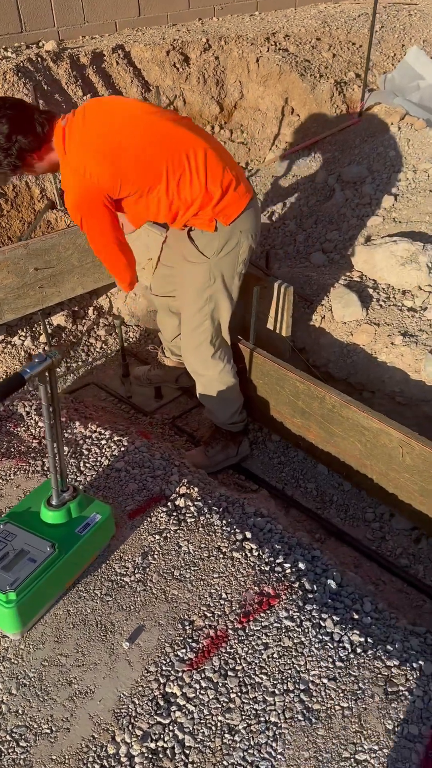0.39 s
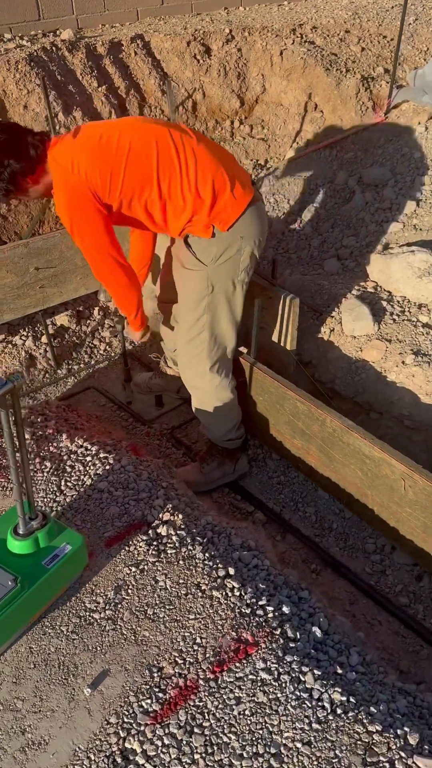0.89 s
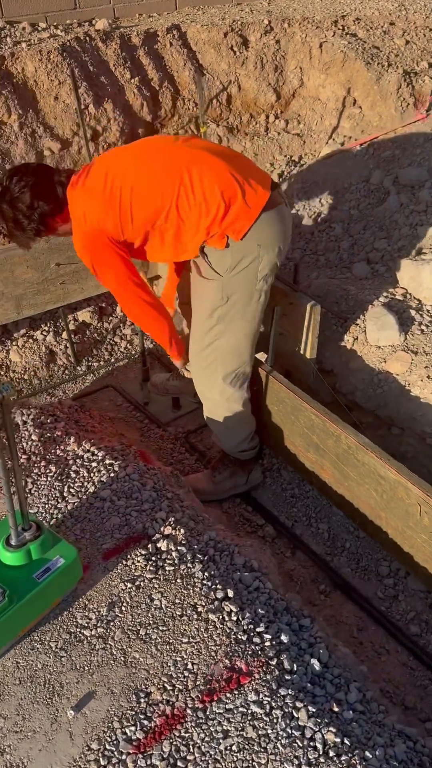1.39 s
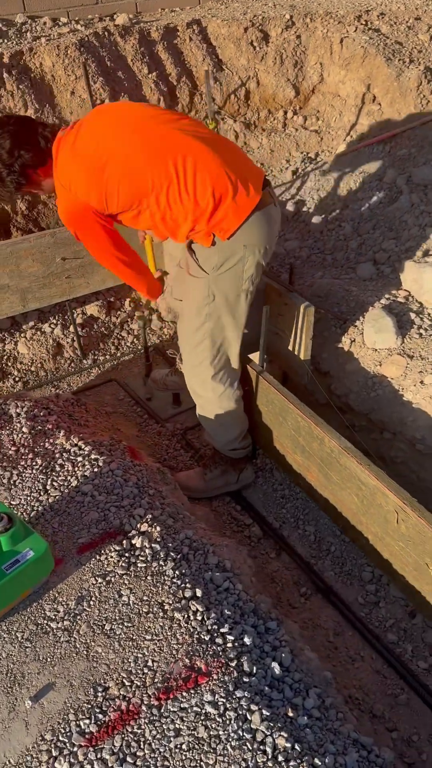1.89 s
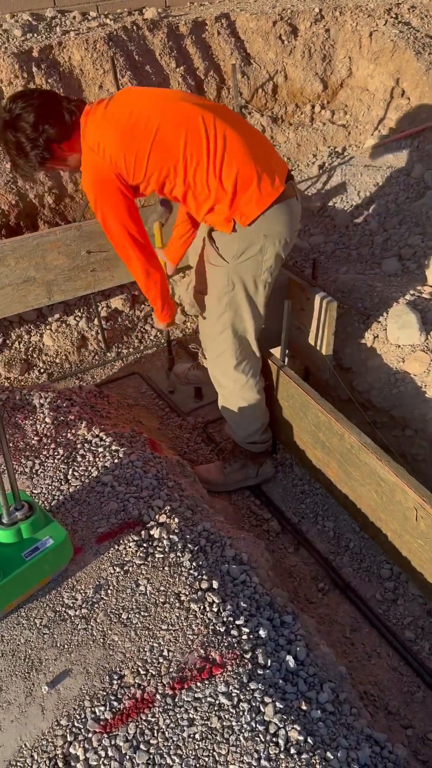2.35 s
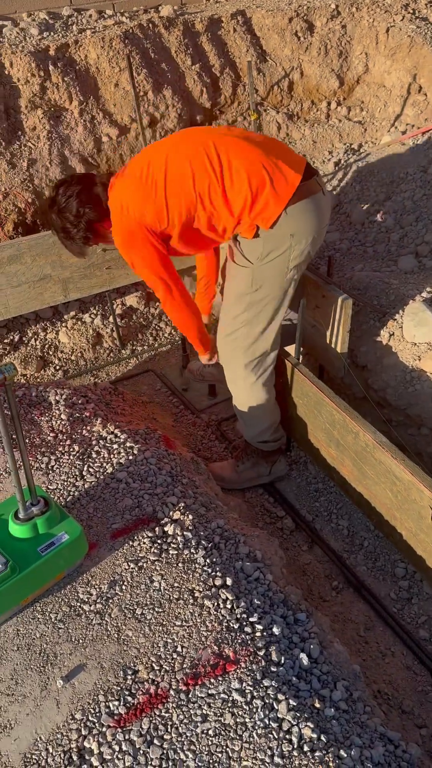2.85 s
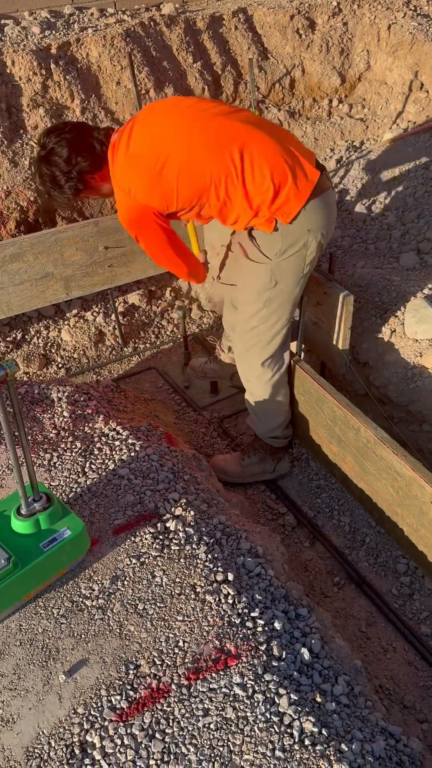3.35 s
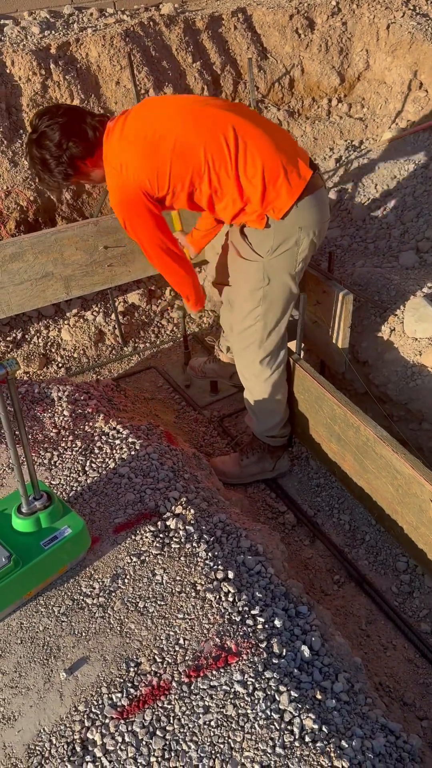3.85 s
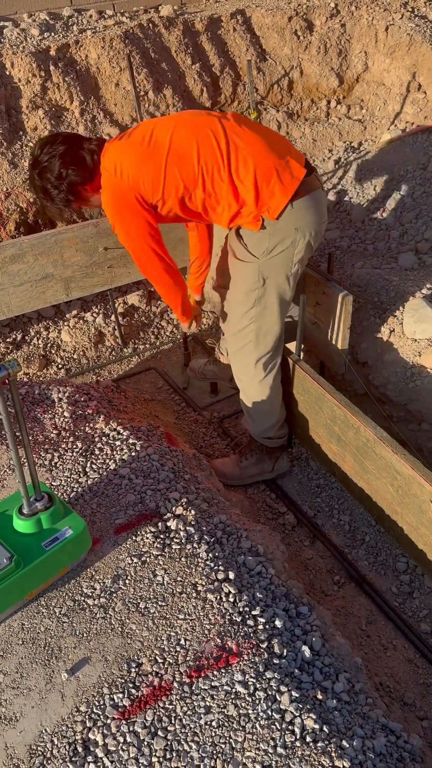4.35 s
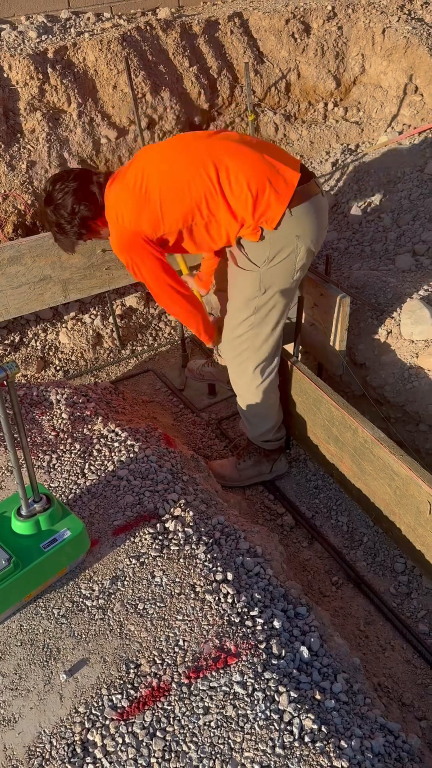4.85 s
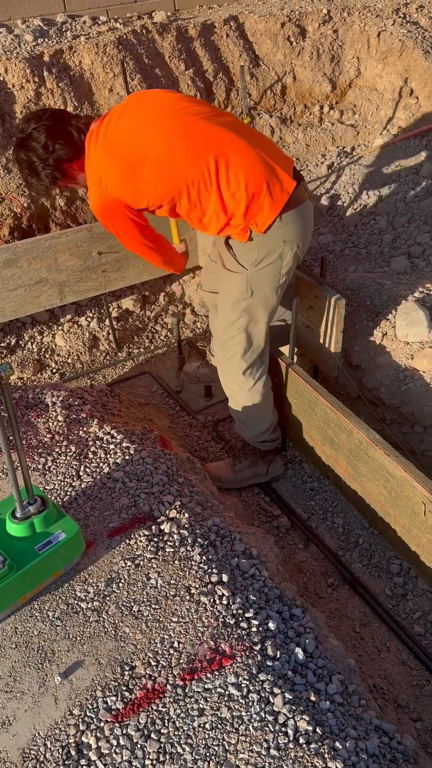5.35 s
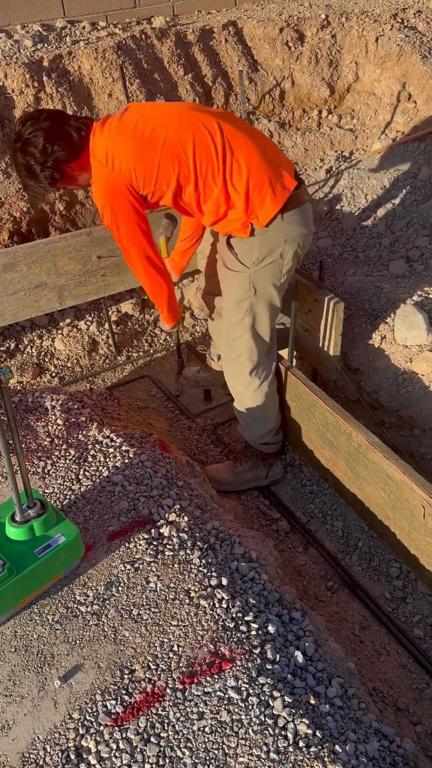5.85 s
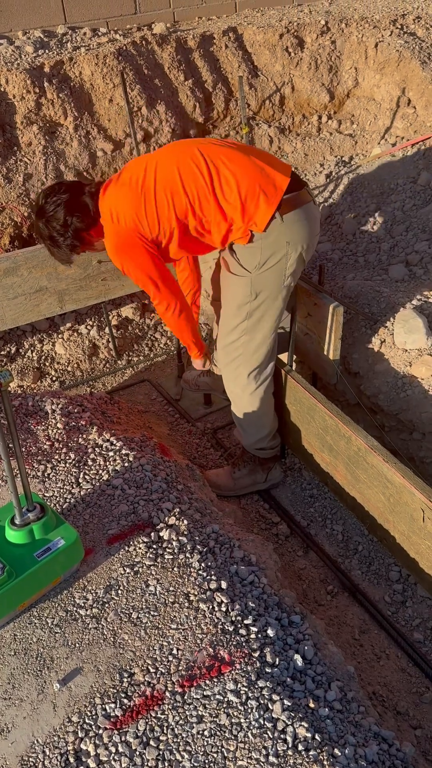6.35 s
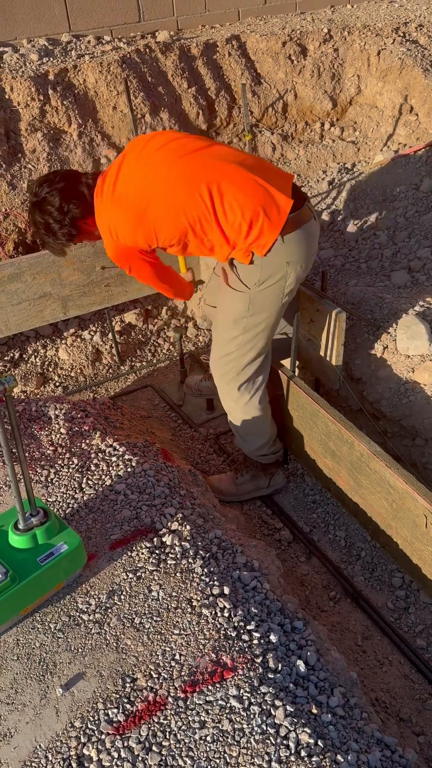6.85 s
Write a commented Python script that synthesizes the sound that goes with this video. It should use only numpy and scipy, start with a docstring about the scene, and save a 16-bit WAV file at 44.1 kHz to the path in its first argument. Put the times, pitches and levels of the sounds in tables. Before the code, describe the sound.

Open-air building site, heard close in stereo, almost without reverberation. A quiet low rumble lasts throughout; a distant engine hums low at the start and fades out by about 3 seconds. Small scuffs of grit come near 0.6 seconds. At about 0.75 a steel hammer cracks onto a steel pin, then again near 1.5, 2.1, 2.8, 3.6, 4.3, 4.9, 5.6, 6.4 and 7.1: ten loud blows of similar strength, slightly uneven in timing. Each begins as a hard bright snap with a short dull thump from the soil, then a loose plate knocks and chatters for about a tenth of a second amid shrill, wavering pin and hammer rings. As the hammer lifts, the pitches slide slightly upward and die, leaving a faint thin ring. Soft gritty rustles fill some gaps, strongest near 1.7 to 2.1 seconds. The last blow is still ringing at the end.

```python
"""Low outdoor rumble runs throughout; a far engine fades over the first seconds, amid soft scuffs of grit.
A sliding steel hammer drives a pin through a loose guide plate into dry soil: ten blows in steady rhythm.
Each is a noise crack, a ground thump of decaying modes, and a pin and hammer ring of wavering sines,
while the plate chatters as crackle through short resonances. Two close microphone ports hear it.
"""
import sys
import numpy as np
from scipy import signal
from scipy.fft import rfft, irfft, next_fast_len
from scipy.io import wavfile
from scipy.ndimage import uniform_filter1d

SR = 44100
rng = np.random.default_rng(int(sys.argv[2]) if len(sys.argv) > 2 else 0)


def field_ratio(decibels):
    """Amplitude ratio for a level in dB (20 dB per decade); scalars and array-likes work."""
    return 10 ** (np.asarray(decibels, dtype=float) / 20)


def pcm_store(signal):
    """Save signal as 16-bit PCM."""
    levels = np.round(np.clip(np.atleast_2d(signal), -1, 1) * 32767)
    wavfile.write(sys.argv[1], SR, levels.astype(np.int16).T)


N = 318843

# outdoor air spectrum: (frequency [Hz], relative density [dB])
AIR = [(20, -10.5), (90, -4), (285, -13.5), (441, -23), (1500, -37.5), (1890, -41.5), (4180, -44.5),
       (9000, -60.5), (12500, -95.5)]
AIR_DB = -66
# level of its lowest band: (time [s], level [dB])
RUMBLE = [(0.0, -61), (2.09, -62), (7.22, -61.5)]
# far engine: (time [s], mean frequency [Hz], mean level [dB])
ENGINE = [(0, 56.3, -52), (.18, 75.4, -57), (0.651, 75.1, -60.5), (1.499, 73.4, -65), (2.1, 76.04, -71),
          (3, 75.6, -83.5)]

# rustles as the worker shifts and raises the hammer:
# (centre [s], nominal level [dB], half length to -9 dB [s])
RUSTLES = [(0.043, -80, 0.04), (0.702, -77.5, 0.14), (0.949, -74.5, 0.082), (1.464, -68, 0.078),
           (1.674, -62, 0.067), (1.876, -72, 0.062), (2.091, -70.5, 0.087), (2.341, -71, 0.069),
           (2.825, -68, 0.069), (3.062, -70, 0.065), (3.503, -81.5, 0.18), (4.762, -74, 0.43),
           (5.149, -74.5, 0.076), (5.843, -74.5, 0.078), (6.545, -69, 0.048)]
# rustle spectrum: (frequency [Hz], relative density [dB])
RUSTLING = [(590, -30), (1000, -6.5), (2860, -5.5), (3330, -4), (4900, -12), (7210, -10.5), (10000, -21),
            (14000, -70)]
# short scuffs of grit: (time [s], level before trim [dB], bright part before trim [dB])
SCUFFS = [(0.087, -62, -8), (0.608, -50, -40), (0.613, -50.5, -37), (0.649, -56.5, -29),
          (0.672, -56, -14.5), (1.401, -56.5, -21), (1.863, -55, -6), (1.89, -51.5, 0.5), (1.911, -54, -28),
          (2.044, -54, -24.5), (2.077, -51.5, -20.5), (2.783, -51, -26), (5.824, -59, -7)]
# scuff spectrum: (frequency [Hz], relative density [dB])
GRIT = [(200, -30), (500, 2), (2500, -1), (4200, -26.5), (7500, -17), (10000, -32.5), (12000, -70)]
# centres of the separately crackling bands [Hz]; small touches differ in colour
CRACKLE_BANDS_HZ = (400, 1300, 2700, 4100, 6500)

# hammer on pin: (time [s], crack level [dB], ground thump level [dB],
# dull part of the crack [dB], bright part [dB], clank level [dB])
BLOWS = [(0.7557, -14.5, -20.5, 1.5, 9.5, -26.5), (1.468, -15, -28, -12.5, 3, -23),
         (2.1354, -14, -25.5, -8, 4.5, -36), (2.8441, -15.5, -26.5, -8.5, 5, -31.5),
         (3.5914, -14.5, -20, -5.5, 2, -33.5), (4.2605, -14, -24.5, -9, 3.5, -27.5),
         (4.9484, -14, -24.5, -8.5, 4, -26.5), (5.6413, -14, -22, -4, 6, -26.5),
         (6.356, -13.5, -29.5, -9, 3.5, -26.5), (7.0559, -13.5, -27, -6.5, 3, -32)]
# crack spectrum: (frequency [Hz], relative density [dB])
CRACK = [(180, -44.5), (300, -19.5), (742, -8), (1060, -5.5), (1800, -7), (2480, -16.5), (2840, -3),
         (3650, -5.5), (5370, -13), (5830, -15.5), (9490, -13), (11200, -33), (15700, -31), (16500, -47.5)]
# modes that simply die away: (frequency [Hz], level against the crack [dB], t60 [s])
FREE_MODES = [(1089.7, -10.5, 0.03), (3510, -9.5, 0.018)]
# clank of the same kind: (frequency [Hz], level against the clank level [dB], t60 [s])
CLANK_MODES = [(2707, 0.5, 0.096)]
# soil and boards: (frequency [Hz], level against the thump [dB], t60 [s])
THUMP_MODES = [(84.6, -10, 0.24), (175.5, 4.5, 0.054), (134, -10.5, 0.17), (259, -6, 0.017)]
# loose soil shudders on after the thump; its level is against the thump
LOOSE_SOIL_HZ, LOOSE_SOIL_WIDTH_HZ, LOOSE_SOIL_DB, LOOSE_SOIL_T60_S = 213, 110, -17.5, .3
# freed hammer: (frequency [Hz], level against the long ring [dB], t60 [s])
LONG_RING = [(3982, 0, .85), (7964, -10, .9), (2710, -8, .6)]

# the hammer rests on the pin, then lifts off: (lift-off [s], first ring of pin high [dB],
# pin middle [dB], pin low [dB], plate chatter before trim [dB])
LIFTS = [(0.836, -50.5, -55.5, -39.5, -37.5), (1.624, -41, -48, -42, -45.5),
         (2.224, -40.5, -53.5, -45, -44.5), (2.974, -47.5, -46, -45, -45), (3.697, -45, -53, -47.5, -39.5),
         (4.44, -39, -38.5, -37.5, -43), (5.013, -47, -53, -57.5, -41.5), (5.723, -40.5, -47.5, -59, -40),
         (6.414, -51.5, -44.5, -50.5, -38), (7.191, -36, -36, -37.5, -40.5)]
# the hands close on the hammer: (time [s], first ring of hammer low [dB], hammer high [dB],
# growth of hammer high until lift-off [dB/s], long ring [dB], what the hands leave of hammer low [dB])
GRIPS = [(0.839, -42.5, -62, 60.5, -58.5, -29.5), (1.691, -45, -56.5, 48, -52.5, -27),
         (2.309, -55, -52.5, -22, -63, -9), (3.035, -51, -53.5, 20.5, -63, -18),
         (3.712, -45.5, -53.5, -63.5, -67.5, -34.5), (4.44, -46, -44, 0.5, -68, -23),
         (5.02, -62, -46, -200, -70, -4), (5.79, -47, -54.5, -200, -78, -18),
         (6.524, -58, -62, -150, -62, -19), (7.225, -50.5, -61.5, 78.5, -48, -23)]
# five families (pin high, middle, low, hammer low, high), one row each, of modes:
# (frequency [Hz], level against the leader [dB], rise in pitch [factor])
FAMILIES = [
    [(7866, 0, 1.0107), (7770, -11, 1), (7497, -14, 1), (15568, -27, 1)],
    [(5975, 0, 1.0129)],
    [(3228, 0, 1.03), (1787, 0, 1)],
    [(5150, 0, 1.004), (1704, 0, 1.02), (3042, 0, 1.003), (3408, -5, 1.02), (10206, 0, 1.002),
     (8120, -13, 1)],
    [(6902, 0, 1.004), (13930, 0, 1.004)],
]
# modes whose share depends on where the blow lands [Hz]
VOICED_HZ = (1704, 3042, 1787, 10206, 13930)
# one row a blow: (added level of each of those modes [dB], ...)
VOICING = [(-19.5, -13.5, -20.5, -2.5, -0.5), (-13, -5.5, -4.5, -17.5, -14.5), (-30.5, -8, -7, -10.5, -2),
           (-14.5, -19.5, -1, -18, -12.5), (-23.5, -7, -2.5, -16.5, -2.5), (-16, -17, -6, -8.5, -15),
           (-5, -13.5, -9.5, -23.5, -10), (-12, -25.5, -7, -34, 2.5), (-18.5, -19, -1.5, -12.5, 2),
           (-13, -17, -8.5, -23, -9.5)]
# modes that the plate shakes most: {frequency [Hz]: factor on their pitch drift}
SHAKEN = {3228: 6, 5975: 3, 7866: 2, 3408: 5}
# build-up of each family after the blow [s]
SWELL_S = [0.012, 0.017, .02, .035, .025]
DAMPING = [(383, -27.5, 107), (429, -11, 134), (520, -34, 137), (225, None, 87.5), (266.5, -14.5, 112)]
# fall of pin high, middle and low while the hammer rests on the pin [dB/s]
PIN_SAG_DB_PER_S = [7, 50, 139]
HAMMER_SAG_DB_PER_S = 29.5  # low family, before the grip
HAMMER_GLIDE_S, WAVER_DB, WAVER_STEP_S = .13, 1.7, .013

# the plate knocks the pin and feeds or chokes the ring: (time [s], level before trim [dB],
# step of pin high [dB], pin middle [dB], hammer low [dB])
KNOCKS = [(0.7949, -24, 3.5, 2.5, -9.5), (1.485, -23.5, 0, 3.5, -1.5), (1.514, -25, -2, 9, 0.5),
          (1.544, -36, 6, -8.5, -0.5), (1.5663, -35, -4, -12.5, 5.5), (1.5947, -37.5, -9, -2, -3),
          (1.703, -46, 16.5, -0.5, -11.5), (2.16, -21.5, -2, 3.5, 2), (2.8854, -28, 2.5, -14, -6),
          (2.897, -25.5, 6.5, 13.5, 7.5), (2.946, -44.5, -9, -18, 5), (3.6274, -23, 5, 5, -0.5),
          (3.638, -32, -6.5, 4, 4), (3.6628, -37, -1, -13, -8), (4.2901, -42, 2, -6.5, -3.5),
          (4.3133, -27.5, 3.5, 1, -2), (4.345, -42, -10, 3.5, 2), (4.358, -38.5, -12, -5.5, 2),
          (4.376, -36.5, 5.5, -1, -8), (4.477, -41.5, 0, -16, -1), (4.9787, -24.5, 2, 0.5, -2.5),
          (5.663, -21.5, -0.5, 5, -4), (5.6912, -32.5, -3, -4, -4), (5.7039, -37.5, -2.5, -5, 1),
          (6.4366, -38, 10, -2, 2.5), (6.5416, -45, -8, -13, -9), (7.1296, -24, -2.5, 3, -10.5),
          (7.1561, -37.5, -7.5, -9, 3.5), (7.171, -30.5, -1.5, -2, 14)]
KNOCK_STEP_S = .016  # the ring changes within this time
# chatter spectrum: (frequency [Hz], relative density [dB])
CHATTER = [(60, -18.5), (200, 5.5), (600, -2.5), (2100, -8.5), (4200, -3), (4800, -1), (8000, -13.5),
           (9500, -44.5), (11500, -80.5)]
# short plate resonances: (frequency [Hz], relative level [dB], t60 [s])
PLATE_MODES = [(1500, -0.5, 0.0046), (2930, -6.5, 0.0064), (3680, -3, 0.005), (4130, 1.5, 0.0052)]
CHATTER_DROP_DB = 19  # lost during contact
# chatter after lift-off: (quick fall [dB/s], tail level [dB], tail fall [dB/s])
CHATTER_DAMPING = (530, -16, 47)

# the two ports: (frequency [Hz], phase by which left leads [rad], left minus right [dB])
PORTS = [(60, 0.05, .3), (200, .1, 1.2), (600, -.45, -.5), (1100, .15, -.8), (2000, 0.1, -.5),
         (2700, .5, -2), (3200, .5, -5), (4000, .3, -1), (5150, -.7, 5), (6000, -.7, .5), (7800, -1.6, 0.1),
         (10200, -2.8, 0.1), (16500, -4.6, 0.1)]


def evened(x):
    """Scales to rms 1."""
    return x / np.sqrt(np.mean(x ** 2) + 1e-20)


def coloured(x, gains):
    """Filters x by gains(hz)."""
    size = next_fast_len(x.shape[-1])
    spectrum = rfft(x, size) * gains(np.fft.rfftfreq(size, 1 / SR))
    return irfft(spectrum, size)[..., :x.shape[-1]]


def read(points, hz, column=1):
    """Interpolates a table column on a log-frequency axis."""
    table = np.transpose(points)
    return np.interp(np.log(hz + 1), np.log(table[0] + 1), table[column])


def add(mix, s, sound):
    """Mixes a sound in at time s."""
    part = mix[round(s * SR):][:len(sound)]
    part += sound[:len(part)]


def air():
    """Outdoor air: random short-time spectra in drifting patches; the lowest band follows its own level."""
    hop = 512
    hz = np.fft.rfftfreq(4 * hop, 1 / SR)
    a, b, c, d, patches = rng.standard_normal((N // hop + 5, len(hz), 5)).T
    patches = uniform_filter1d(patches, size=16, axis=0)
    patches = evened(uniform_filter1d(patches, size=8, axis=1))
    left = a + 1j * b
    right = left + 0.25 * (c + 1j * d)
    spectra = np.array([left, right]) * field_ratio(read(AIR, hz)[:, None] + 2.4 * patches)

    def band(share):
        return evened(signal.istft(spectra * share, nperseg=4 * hop, noverlap=3 * hop)[1][:, :N])

    low = np.clip((140 - hz) / 50, 0, 1)[:, None]
    s, db = np.transpose(RUMBLE)
    rumble_gain = field_ratio(np.interp(np.arange(N) / SR, s, db))
    return rumble_gain * band(low) + field_ratio(AIR_DB) * band(1 - low)


def engine():
    """A far engine revs up at first, then fades; partials at 1, 1.5 and 2 times a wavering pitch."""
    s, hz, db = np.transpose(ENGINE)
    t = np.arange(N) / SR
    wobble, flutter = (evened(coloured(row, lambda f: 1 / (1 + (f / 5) ** 2)))
                       for row in rng.standard_normal((2, N)))
    phase = 2 * np.pi * np.cumsum(np.interp(t, s, hz) + 1.5 * wobble) / SR
    tone = np.sin(phase) + field_ratio(-9) * np.sin(1.5 * phase) + field_ratio(-12) * np.sin(2 * phase)
    return np.sqrt(2) * field_ratio(np.interp(t, s, db) + flutter) * tone


def grains(spectrum, per_s, spread_db, length_s):
    """Random crackle: in each band, clicks of uneven size smear into tiny noise puffs (per_s a band)."""
    out = np.zeros(N)
    smear = np.exp(-np.arange(SR // 50) / (length_s * SR))
    for k in range(len(CRACKLE_BANDS_HZ)):
        clicks = field_ratio(spread_db * np.minimum(rng.exponential(1, N), 4)) * (rng.random(N) < per_s / SR)
        puffs = signal.oaconvolve(clicks, smear)[:N] * rng.standard_normal(N)
        share = [(hz, float(j == k)) for j, hz in enumerate(CRACKLE_BANDS_HZ)]
        out += coloured(puffs, lambda hz: field_ratio(read(spectrum, hz)) * np.sqrt(read(share, hz)))
    return evened(out)


def burst(spectrum, dull_db, bright_db, rise_s, hold_s, t60_s, tail_db):
    """A puff of coloured noise: quick rise, short hold, fast fall into a weaker tail."""
    t = np.arange(SR // 10) / SR
    tilt = [(1600, dull_db), (2400, 0), (4800, 0), (5600, bright_db)]
    noise = rng.standard_normal(len(t))
    noise = evened(coloured(noise, lambda hz: field_ratio(read(spectrum, hz) + read(tilt, hz))))
    fall = field_ratio(-60 * np.maximum(t - hold_s, 0) / t60_s) + field_ratio(tail_db - 12 * t / t60_s)
    return noise * np.minimum(t / rise_s, 1) ** 2 * fall


def grit():
    """Dry grit: soft, uneven crackling rustles as the worker moves, and short noise scuffs."""
    t = np.arange(N) / SR
    swells = sum(field_ratio(db - 9 * ((t - s) / half_s) ** 2) for s, db, half_s in RUSTLES)
    uneven = evened(coloured(rng.standard_normal(N), lambda hz: 1 / (1 + (hz / 25) ** 2)))
    out = swells * field_ratio(2 * uneven) * grains(RUSTLING, 900, 3.1, 0.002)
    for s, db, bright_db in SCUFFS:
        add(out, s - .002, field_ratio(db - 7.5) * burst(GRIT, 0, bright_db + 11.5, 0.005, 0.006, 0.029, -17))
    return out


def dying(modes, onset_s):
    """A sum of decaying sines, each draw slightly different in pitch and level."""
    t = np.arange(SR) / SR
    ring = np.zeros(SR)
    for (hz, db, t60_s), (a, b) in zip(modes, rng.standard_normal((len(modes), 2))):
        ring += field_ratio(db + 0.91 * a - 60 * t / t60_s) * np.sin(2 * np.pi * hz * (1 + 0.00016 * b) * t)
    return ring * np.minimum(t / onset_s, 1)


def soil_shudder():
    """Loose soil: band-limited noise that dies away."""
    t = np.arange(SR // 2) / SR
    noise = rng.standard_normal(len(t))
    noise = coloured(noise, lambda hz: 1 / (1 + ((hz - LOOSE_SOIL_HZ) / LOOSE_SOIL_WIDTH_HZ) ** 4))
    return field_ratio(LOOSE_SOIL_DB - 60 * t / LOOSE_SOIL_T60_S) * np.minimum(t / 0.013, 1) * evened(noise)


def blows():
    """Steel cracks on steel, a slower thump returns through the ground, the freed hammer sings on."""
    out = np.zeros(N)
    for blow, (lift_off, *_), (*_, long_db, _) in zip(BLOWS, LIFTS, GRIPS):
        s, crack_db, thump_db, dull_db, bright_db, clank_db = blow
        crack = burst(CRACK, dull_db, bright_db, 0.002, 0.0031, 0.018, -17.0)
        add(out, s - .001, field_ratio(crack_db) * crack)
        add(out, s, field_ratio(crack_db) * dying(FREE_MODES, 0.0016))
        add(out, s, field_ratio(clank_db) * dying(CLANK_MODES, 0.0043))
        add(out, lift_off - .02, field_ratio(long_db) * dying(LONG_RING, 0.064))
        add(out, s + 0.0083, field_ratio(thump_db) * dying(THUMP_MODES, 0.0032))
        add(out, s + .01, field_ratio(thump_db) * soil_shudder())
    return out


def damped(since, fall_db_per_s, tail_db, tail_db_per_s):
    """Gain 1 until the damping sets in, then a quick fall into a slower tail."""
    since = np.maximum(since, 0)
    return (field_ratio(-fall_db_per_s * since) + field_ratio(tail_db - tail_db_per_s * since)) / (1 + field_ratio(tail_db))


def leaders(t, lift, grip):
    """Gains of the five leading modes after a blow: contact sag, knock steps, then damping."""
    lift_off, *pin_db, _ = lift
    grip_s, low_db, high_db, growth_db_per_s, _, left_db = grip
    s, _, *steps_db = np.transpose([knock for knock in KNOCKS if t[0] < knock[0] < t[-1]])
    progress = np.clip((t - s[:, None]) / KNOCK_STEP_S, 0, 1)
    high_step, middle_step, low_step = np.array(steps_db) @ progress
    resting = np.minimum(t, lift_off) - t[0]
    ungripped = np.minimum(t, grip_s) - t[0]
    levels_db = [db + step - sag * resting
                 for db, step, sag in zip(pin_db, (high_step, middle_step, 0), PIN_SAG_DB_PER_S)]
    levels_db.append(low_db + low_step - HAMMER_SAG_DB_PER_S * ungripped)
    levels_db.append(high_db + growth_db_per_s * resting)
    ends = [lift_off, lift_off, lift_off, grip_s, lift_off]
    return [field_ratio(db) * damped(t - end, fall, tail_db or left_db, fade)
            for db, end, (fall, tail_db, fade) in zip(levels_db, ends, DAMPING)]


def ringing():
    """Pin and hammer ring unevenly; knocks feed or choke them, and many modes rise in pitch with damping."""
    out = np.zeros(N)
    for (start, *_), lift, grip, voicing in zip(BLOWS, LIFTS, GRIPS, VOICING):
        t = start + np.arange(round(.65 * SR)) / SR
        knots = np.arange(start, t[-1], WAVER_STEP_S)
        lifted = np.clip((t - lift[0] + 0.035) / 0.065, 0, 1)
        hammer_glides = [np.clip((t - s) / HAMMER_GLIDE_S + .3, 0, 1) for s in (grip[0], lift[0])]
        glides = [lifted] * 3 + hammer_glides
        shares = dict(zip(VOICED_HZ, voicing))
        shares[2 * VOICED_HZ[0]] = voicing[0]  # the octave follows the lowest mode
        for family, (leader, glide, modes) in enumerate(zip(leaders(t, lift, grip), glides, FAMILIES)):
            swell = np.minimum((t - start) / SWELL_S[family], 1) ** 2
            for k, (hz, db, rise) in enumerate(modes):
                loose = SHAKEN.get(hz, 1)
                phase, spread = rng.random(size=2)
                waver, drift = (np.interp(t, knots, row) for row in rng.standard_normal((2, len(knots))))
                pitch = hz * (1 + (rise - 1) * glide + .0006 * loose * drift)
                turns = np.cumsum(pitch) / SR + phase
                share_db = shares.get(hz, 3 * (spread - .5) * (k > 0))
                # the pin's weak and low modes die with the contact
                choke_db = -9 * lifted * (k > 0 and family < 2 or family == 2)
                gain = leader * field_ratio(db + WAVER_DB * np.sqrt(loose) * waver + share_db + choke_db)
                add(out, start, np.sqrt(2) * gain * np.sin(2 * np.pi * turns) * swell)
    return out


def plate():
    """The loose plate chatters on the pin: clear knocks in a blur of small ones, ringing its short modes."""
    t, level = np.arange(N) / SR, np.zeros(N)
    for (start, *_), (lift_off, *_, chatter_db) in zip(BLOWS, LIFTS):
        rested = np.clip((t - start) / (lift_off - start), 0, 1)
        decay = damped(t - lift_off, *CHATTER_DAMPING) * (t > start + .004)
        level += field_ratio(chatter_db - CHATTER_DROP_DB * rested) * decay
    touches = field_ratio(7.0) * level * grains(CHATTER, 220, 3.4, .0025)
    for s, db, *_ in KNOCKS:
        dull_db = -2.5 + 3 * rng.standard_normal()
        bright_db = -4 + 3 * rng.standard_normal()
        knock = burst(CHATTER, dull_db, bright_db, 0.00037, 0.00049, 0.035, -27.5)
        add(touches, s - .001, field_ratio(db - 7.0) * knock)
    resonance = signal.oaconvolve(touches, dying(PLATE_MODES, 0.00075))[:N]
    return field_ratio(-6) * touches + field_ratio(-19) * resonance


def scene():
    """All sources but the stereo air share one direction."""
    return air() + engine() + grit() + blows() + ringing() + plate()


def band_limit(x):
    """A steep low-pass at the top of the band."""
    return signal.sosfilt(signal.butter(12, 17010, fs=SR, output="sos"), x)


def record(dry):
    """Two ports differ in phase and level; the microphone drops the deepest bass and the top treble."""
    side = np.array([[.5], [-.5]])
    ported = coloured(dry, lambda hz: np.exp(1j * side * read(PORTS, hz))
                      * field_ratio(side * read(PORTS, hz, column=2)))
    rounded = .6 * np.tanh(ported / .6)  # the input stage rounds off the highest peaks
    treble_cut = coloured(rounded, lambda hz: 1 / (1 + (hz / 16500) ** 60))
    heard = signal.lfilter(*signal.butter(2, 45, "high", fs=SR), treble_cut)
    return band_limit(heard)


dry = scene()
out = record(dry)
pcm_store(out)
```